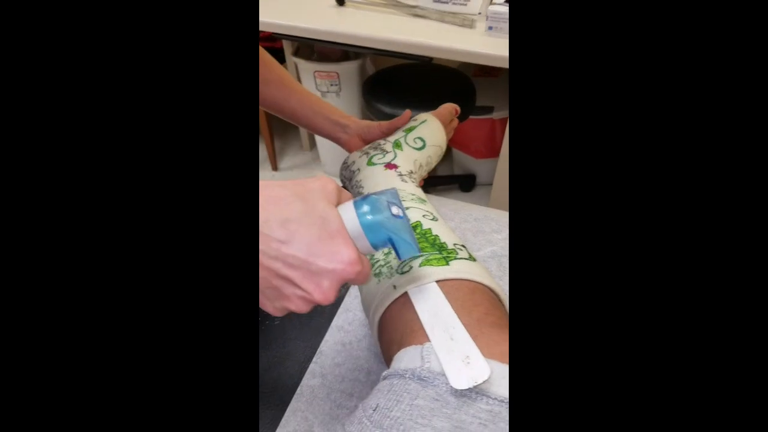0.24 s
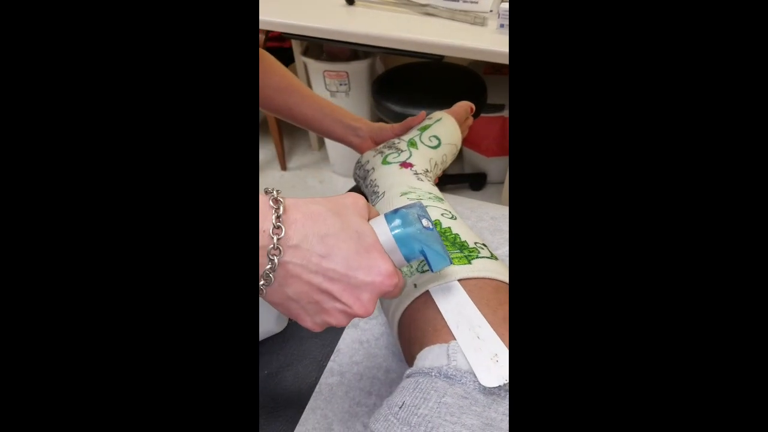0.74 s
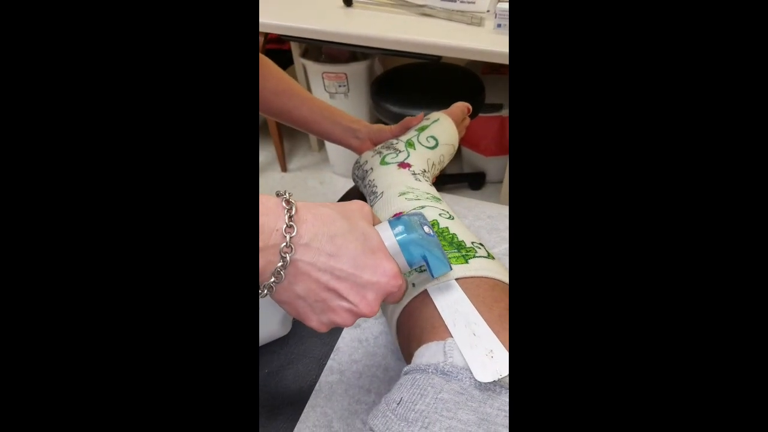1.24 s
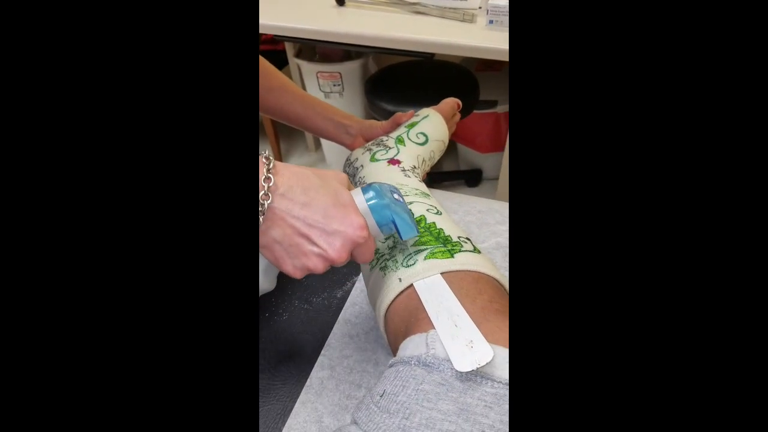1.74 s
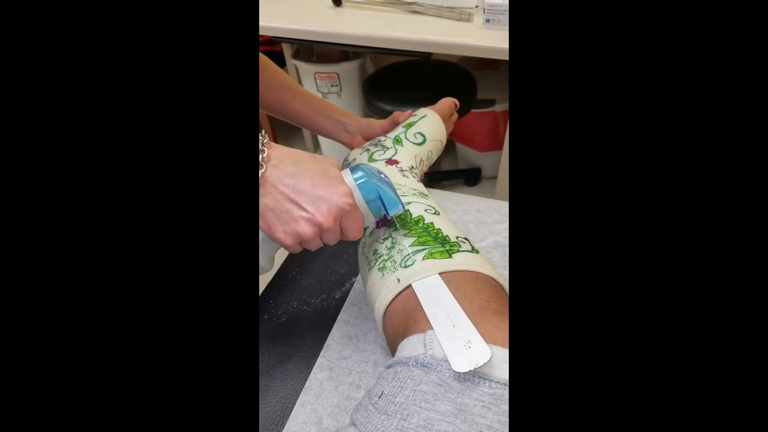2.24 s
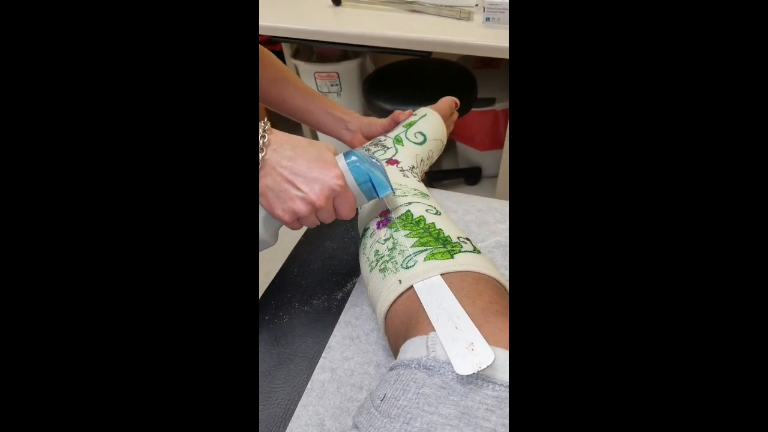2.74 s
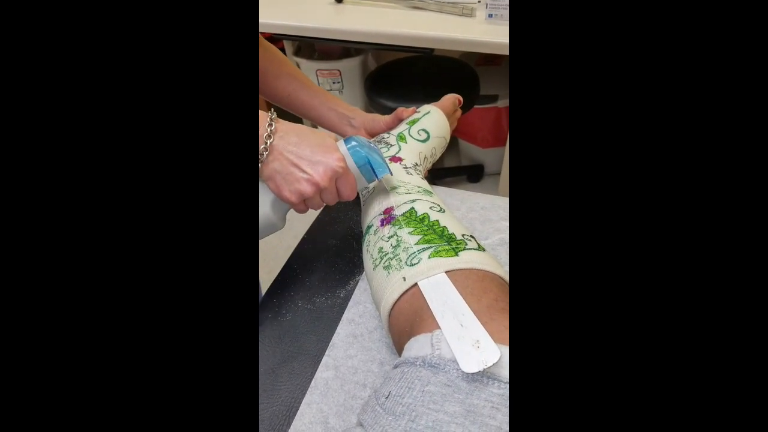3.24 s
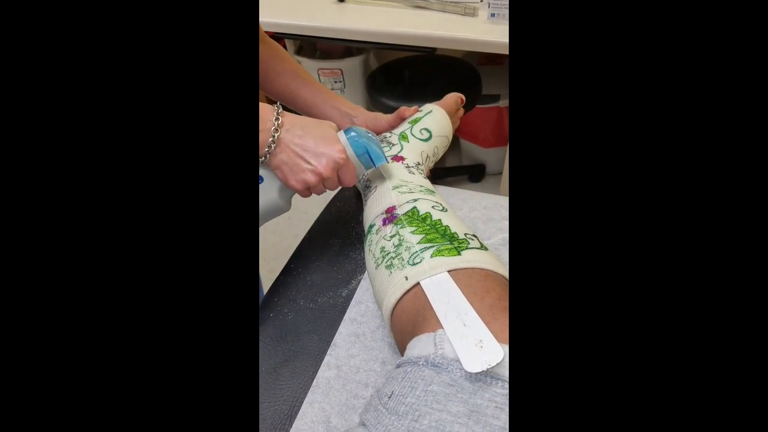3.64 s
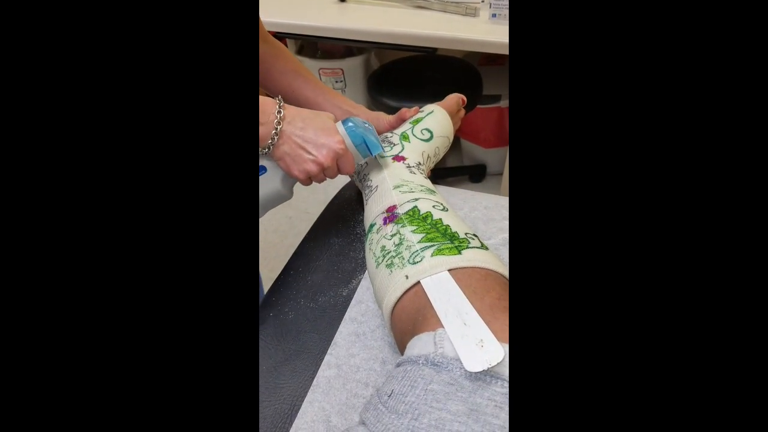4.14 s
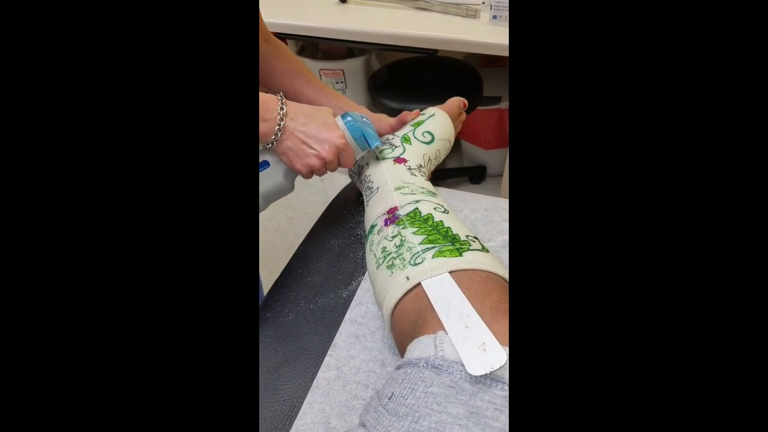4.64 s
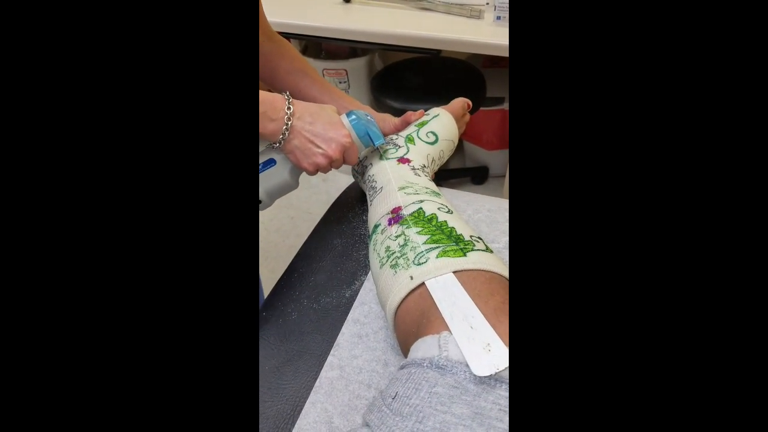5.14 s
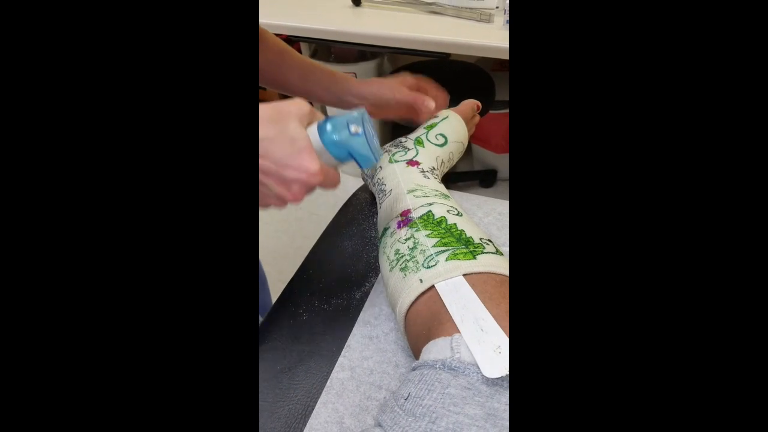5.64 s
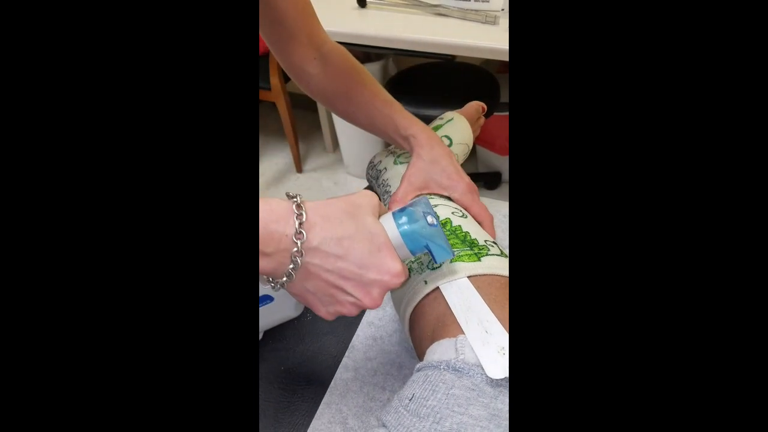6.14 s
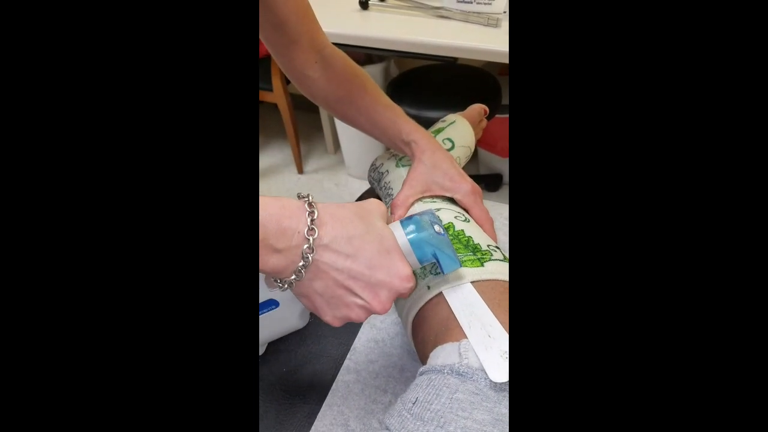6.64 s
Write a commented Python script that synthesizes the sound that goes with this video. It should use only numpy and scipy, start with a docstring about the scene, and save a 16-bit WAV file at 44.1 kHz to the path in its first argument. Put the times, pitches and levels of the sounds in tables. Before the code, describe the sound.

Close, piercing electric saw whine over airy fan rush sags into rough chattering and squealing while cutting a hard shell, with one short clear break.

```python
"""An oscillating cast saw runs close by in a small clinic room and is pushed along a hard leg cast.
Free, its motor whines in multiples of the stroke rate over filtered-noise fan rush; in the cut the motor sags,
the blade rings on the fifth multiple, chatters in fraying partials and rasps in bursts of noise.
The cast shell thrums at the stroke rate, partials squeal and catches of the blade thud in the leg.
The saw is lifted out after five seconds and set in again a second later."""
import sys
import numpy as np
from scipy import signal
from scipy.fft import rfft, irfft, next_fast_len
from scipy.io import wavfile
from scipy.ndimage import uniform_filter1d, minimum_filter1d

SR = 44100
rng = np.random.default_rng(int(sys.argv[2]) if len(sys.argv) > 2 else 0)


def dump_mix(stems):
    """Bounce the given channels to the path in sys.argv[1] as a 16-bit WAV at rate SR."""
    frames = np.atleast_2d(stems).T  # one column per channel
    limited = np.clip(frames, -1, 1)  # hard clip at full scale
    pcm = np.round(limited * 32767).astype(np.int16)
    wavfile.write(sys.argv[1], SR, pcm)


N = 303849
T = np.arange(N) / SR  # time of every sample, s

# motor speed before its fine jitter, sagging as the blade is pushed in: (time [s], stroke rate [Hz])
STROKE_RATE = [(0, 281.1), (1.0, 278.8), (1.35, 276.6), (1.68, 267.7), (2.15, 266.3), (2.6, 264),
               (3.1, 262.7), (3.55, 261.4), (3.9, 260.9), (4.4, 255.3), (4.85, 250.8), (5.3, 247.5),
               (5.42, 267.2), (5.55, 274), (5.95, 278.4), (6.3, 279.8), (6.52, 274), (6.89, 256.6)]
# balance of the motor's partials: (multiple of the stroke rate, relative level [dB])
WHINE_PARTIALS = [(3, -2), (4, -9.5), (6, -14), (7, 6.5), (8, -2), (9, -5.5), (10, 0), (11, -5), (12, -9),
                  (13, -6.5), (14, -2), (15, -5), (16, -15), (19, -30), (21, -24), (25, -12), (26, -13.5),
                  (27, -14), (28, -30), (29, -13), (31, -13.5), (33, -15), (35, -15), (37, -18.5)]
# the blade singing on the fifth multiple of the stroke: (time [s], level [dB])
RING_LEVEL = [(0, -27.5), (.35, -23.5), (.9, -26), (1.2, -19.5), (1.32, -25.5), (1.5, -21), (2.6, -19),
              (3.45, -23.5), (3.75, -28.5), (4.15, -23.5), (5.29, -45), (5.38, -21), (5.62, -27.5),
              (6.12, -15), (6.42, -22.5), (6.6, -16.5), (6.89, -28.5)]
# hum at the stroke rate, loud where the saw bears on the hollow shell: (time [s], level [dB])
THRUM_LEVEL = [(0, -42.5), (1.0, -39), (1.3, -56), (1.55, -38), (2.7, -40), (2.88, -30.5), (3.45, -27),
               (4.1, -23), (5.32, -24.5), (5.35, -48.5), (6.2, -41), (6.42, -43), (6.68, -27.5),
               (6.89, -28.5)]
# hiss of air and dust at the blade, before trim and room: (time [s], level [dB])
HISS_LEVEL = [(0, -26), (1.2, -27), (1.36, -23.5), (1.8, -29), (2.35, -28), (3.0, -31), (3.6, -26.5),
              (4.2, -26.5), (5.12, -21.5), (5.38, -30.5), (5.55, -28), (6.4, -25), (6.89, -31.5)]
# the blade catches and bumps the leg, before trim and soft attack: (time [s], level [dB])
BUMP_HITS = [(1.785, -45), (2.404, -42), (2.553, -50), (2.788, -36), (3.459, -39), (3.727, -44),
             (3.832, -42), (5.315, -41), (5.389, -37), (6.531, -30), (6.667, -29), (6.777, -41)]
# spectra of the fan, chatter, rasp, hiss and shell rattle: (frequency [Hz], relative level [dB])
FAN_SPECTRUM = [(100, -62), (200, -38), (330, -11), (470, -30), (680, -36), (900, -7), (1200, -18),
                (1400, -6), (2100, -3), (2450, -7), (3100, 0), (4100, 1), (4900, -14), (14000, -30)]
CHATTER_SPECTRUM = [(530, -24), (800, -10), (1100, -11.5), (1550, -0.5), (2200, -4.5), (3000, -5),
                    (3400, -9), (4100, -7.5), (5000, -16)]
RASP_SPECTRUM = [(40, -46), (130, -39.5), (260, -11), (420, -14.5), (660, -16), (900, -7.5), (1150, -11.5),
                 (1500, -4), (2000, 1), (3000, -6), (4100, -23.5), (5200, -15), (14000, -41)]
HISS_SPECTRUM = [(200, -86), (900, -73), (2500, -17.5), (4200, 3), (5100, -2), (6400, -1), (7900, 2.5),
                 (8600, -2), (9200, -8.5), (12500, -4), (14500, -9)]
SHELL_SPECTRUM = [(25, -32), (60, -39), (130, 16), (240, -61), (420, 29), (650, 15.5), (1000, 30),
                  (2000, -56)]
# likeness of the noise at left and right, held within 0 to 1 when used: (frequency [Hz], likeness)
STEREO_LIKENESS = [(100, 1.6), (500, 0.7), (1400, -2.2), (2500, 1.24), (4500, -2), (14000, 0.74)]
# stereo tone balance: (frequency [Hz], left minus right [dB])
STEREO_BALANCE = [(100, -1), (260, -2.5), (600, -3), (1400, -.5), (2500, -1.5), (4200, -5), (6000, -4),
                  (8500, 4.5), (14000, 5)]
# a multiple of the stroke meets a mode of the blade or shell and flares up:
# (middle [s], length [s], multiple of the stroke rate, swell level before stutter [dB], left minus right [dB])
SQUEAL_SWELLS = [(0.827, 0.57, 14, -28.5, -25), (1.16, 0.32, 7, -24.5, 0), (1.294, 0.43, 15, -27, -19),
                 (1.43, 0.27, 10, -27.5, -23), (1.967, 0.53, 8, -27, 4), (2.03, 0.41, 6, -28, 10),
                 (2.05, 0.63, 9, -25.5, -3), (2.12, 0.87, 3, -33.5, 23), (3.524, 0.61, 8, -27, 9),
                 (3.96, .14, 11, -22, -1), (3.957, 0.12, 10, -22, -6), (3.986, 0.12, 8, -16, 6),
                 (4.022, 0.43, 6, -21.5, 2), (4.092, 1.07, 2, -29, -15), (4.356, 0.17, 8, -22, 5),
                 (4.53, .16, 8, -20, 4), (4.597, 0.17, 2, -26.5, -11), (4.815, 0.25, 8, -26, 7),
                 (4.861, 0.57, 10, -23, -2), (4.998, 0.24, 8, -28.5, 6), (5.12, 0.26, 10, -24.5, -3),
                 (5.301, 0.33, 8, -34, 7), (5.31, 0.053, 2, -24, -6), (5.899, 1.06, 11, -31, -8),
                 (5.949, 0.68, 15, -29.5, -9), (6.2, 0.43, 7, -27.5, -23), (6.5, 0.2, 10, -19.5, -8),
                 (6.739, 0.22, 3, -35, -2)]
# the blade is in the cast: (set in [s], lifted out [s])
CUT_TIMES = [(1.14, 5.33), (6.27, 7.0)]
# layer levels: (running free [dB], change in the slot [dB], further change at full load [dB])
WHINE_LAW = (-15.5, -12.5, -31)
CHATTER_LAW = (-44, 23.5, 2)
RASP_LAW = (-43.5, 15.5, -5)  # before the room
OCTAVE_LAW = (-37.5, 0.5, 6)
# where the saw is on the leg, 0 at the shin and 1 at the ankle, at times beyond: (time [s], place)
LEG_PLACE = [(0, 0.95), (.8, -1.04), (1.7, 0.24), (3.7, 0.66), (5.5, 0.7), (6.2, 0), (6.89, -.2)]
# the teeth tear out a patch of fibres, before the room: (middle [s], length [s], peak level [dB])
FIBRE_TEARS = [(1.57, 0.32, -31), (1.795, 0.046, -24), (2.11, 0.36, -27), (2.328, 0.17, -21),
               (2.798, 0.19, -24.5), (3.23, 0.2, -25), (3.4, 0.092, -20), (3.694, 0.56, -19.5),
               (4.153, 0.26, -22), (4.446, 0.23, -22.5), (4.65, 0.16, -24), (5.318, 0.094, -34),
               (6.48, 0.28, -26)]

FREE_HZ, FULL_SAG_HZ = 280, 30  # unloaded stroke rate, and its drop at full load
SINK_S, CLEAR_S = 0.3, 0.081  # time to sink into the slot and to come clear of it
BLADE_HZ, BLADE_WANDER_HZ = 2057, 40  # resonance of the blade, shifting a little with the slot's grip
FAN_DB = -28.5  # rush of the motor's fan, before the room
DISPERSION = .5  # the saw's body smears each stroke: phase lag in radians per squared multiple
EDGE_HZ = 14600  # upper band limit


def amp(db):
    """Decibels to gain."""
    return 10 ** (np.asarray(db) / 20)


def unit(x):
    """Scales to rms 1."""
    return x / np.sqrt(np.mean(abs(x) ** 2) + 1e-20)


def curve(rows, axis=1):
    """One column of a time table at every sample."""
    rows = np.array(rows)
    return np.interp(T, rows[:, 0], rows[:, axis])


def read(points, hz):
    """A spectrum table on a log-frequency axis."""
    f, value = np.transpose(points)
    return np.interp(np.log(hz + 1), np.log(f + 1), value)


def drift(hz):
    """Slow chance of rms 1, up to about hz changes a second."""
    count = 4096
    f = np.fft.rfftfreq(count, T[-1] / count)
    rolloff = np.sqrt(1 + (f / hz) ** 4)
    slow = irfft(rfft(rng.standard_normal(count)) / rolloff)
    return np.interp(T, np.linspace(0, T[-1], count), unit(slow))


def flutter(hz):
    """Random wobble in both strength and phase, rms 1."""
    return (drift(hz) + 1j * drift(hz)) / np.sqrt(2)


def arch(middle, length):
    """A swell from 0 to 1 and back."""
    now = abs(T - middle) < length / 2
    out = np.zeros(N)
    out[now] = np.cos(np.pi * (T[now] - middle) / length)
    return out


def colour(x, points, size=4096):
    """Causal minimum-phase filter with the given spectrum, scaled to rms 1."""
    hz = abs(np.fft.fftfreq(size, 1 / SR))
    log_gain = np.log(amp(read(points, hz)))
    response = np.exp(np.conj(signal.hilbert(log_gain)))
    taps = np.fft.ifft(response).real[:size // 2]
    return unit(signal.oaconvolve(x, taps[None], axes=1)[:, :N])


def resonate(x, hz, width_hz):
    """A resonance of gain 1 that follows the curve hz."""
    turn = np.exp(2j * np.pi * np.cumsum(hz) / SR)
    r = np.exp(-np.pi * width_hz / SR)
    # shift the resonance down to 0 Hz, smooth there, and shift back
    smooth = signal.lfilter([1 - r], [1, -r], x / turn)
    return 2 * (turn * smooth).real


def stereo(pair):
    """Blends two unrelated signals so that left and right are as alike as the likeness table says."""
    size = next_fast_len(N)
    a, b = rfft(pair, size)
    same = np.clip(read(STEREO_LIKENESS, np.fft.rfftfreq(size, 1 / SR)), 0, 1)
    mid = a * np.sqrt(1 + same)
    side = b * np.sqrt(1 - same)
    return unit(irfft(np.array([mid + side, mid - side]), size)[:, :N])


def noise():
    """White noise in stereo."""
    return stereo(rng.standard_normal((2, N)))


def lean(db):
    """Left and right gains for a left-minus-right level, at equal total power."""
    pair = amp(np.outer([.5, -.5], db))
    return pair / np.sqrt((pair ** 2).mean(axis=0))


def partial(turns, order, apart):
    """One multiple of the stroke, reaching left and right out of step by twice apart, in radians."""
    phase = 2 * np.pi * (order * turns % 1) - DISPERSION * order ** 2
    left_right = (phase + np.array([[1], [-1]]) * apart).astype(np.float32)
    return np.cos(left_right) + 1j * np.sin(left_right)


def depth():
    """How deep the blade sits in the slot, 0 to 1."""
    total = 0
    for start, end in CUT_TIMES:
        sinking = np.clip((T - start) / SINK_S, 0, 1)
        clearing = np.clip(1 - (T - end) / CLEAR_S, 0, 1)
        total = total + sinking * clearing
    return total


def load():
    """How hard the motor works, 0 to 1: its speed sags in proportion."""
    return np.clip((FREE_HZ - curve(STROKE_RATE)) / FULL_SAG_HZ, 0, 1)


def level(law):
    """A layer's gain from the blade's depth and the motor's load."""
    free_db, slot_db, load_db = law
    return amp(free_db + slot_db * depth() + load_db * load())


def blade_hz():
    """The blade's wandering resonance at every sample."""
    return BLADE_HZ + BLADE_WANDER_HZ * drift(3.3)


def gripped(x, width_hz, lift):
    """The blade's moving resonance lifts part of the cutting sound."""
    return unit(x + lift * resonate(x, blade_hz(), width_hz))


def tearing():
    """Strength of the rasp: a steady scrape in the slot and a swell for each torn patch, summed in power."""
    patches = sum((amp(db) * arch(s, length)) ** 2 for s, length, db in FIBRE_TEARS)
    return np.sqrt(level(RASP_LAW) ** 2 + patches)


def room(x, t60=.3, wet_db=-11):
    """A short diffuse tail of decaying noise from the hard walls, different at left and right."""
    t = T[:SR // 2]
    tail = rng.standard_normal((2, len(t))) * amp(-60 * t / t60) * (t > .004)
    tail /= np.linalg.norm(tail, axis=1, keepdims=True)
    return x + amp(wet_db) * signal.oaconvolve(x, tail, axes=1)[:, :N]


def air(turns, hiss_db=-3.42, gate=0.22, flicker_db=2.0):
    """Fan rush and the hiss of air and dust at the blade, both noise that pulses with each stroke and flickers."""
    puffs = (1 + gate * np.sin(2 * np.pi * turns)) * amp(flicker_db * drift(76))
    fan = amp(FAN_DB) * colour(noise() * puffs, FAN_SPECTRUM)
    hiss = amp(curve(HISS_LEVEL) + hiss_db) * colour(noise() * puffs, HISS_SPECTRUM)
    return fan + hiss


def bumps(leg_hz=120, t60=0.092, rise=0.0063, level_db=3):
    """Each catch of the blade gives the padded leg a short low thud, a decaying sine."""
    out = np.zeros(N)
    detunes = rng.uniform(0.92, 1.08, len(BUMP_HITS))
    for (s, db), detune in zip(BUMP_HITS, detunes):
        part = out[round(s * SR):][:SR // 4]  # a view: adding to it adds to out
        t = T[:len(part)]
        envelope = amp(db + level_db - 60 * t / t60) * (1 - np.exp(-t / rise))
        part += envelope * np.sin(2 * np.pi * leg_hz * detune * t)
    return out


def thrum(turns, shake=0.26, waver_db=2, rattle_db=3, tear=0.79):
    """A hum at the stroke rate and its octave; hard, tearing pressure adds a dull rattle of the hollow shell."""
    first = amp(curve(THRUM_LEVEL))
    second = level(OCTAVE_LAW) * amp(waver_db * depth() * drift(13))
    stroke = np.exp(2j * np.pi * turns)
    unsteady = shake * (0.66 + 0.53 * depth())  # steadier in free air
    hum = first * stroke * (1 + unsteady * flutter(18))
    hum = hum + second * stroke ** 2 * (1 + unsteady * flutter(23))
    rattle = first * tearing() ** tear * amp(rattle_db) * colour(noise(), SHELL_SPECTRUM)
    return np.sqrt(2) * hum.imag + rattle


def bearing(turns, ratios=(7.215, 11.14), level_db=-37):
    """Faint bearing tones between the partials, unsteady in phase."""
    return amp(level_db) * sum(np.sin(2 * np.pi * r * turns + drift(12.0)) for r in ratios)


def squeals(turns, apart=0.76):
    """Single partials swell, stutter and die away as the blade binds or swings free."""
    shake, stutter_db = .3, 1.5
    bead_hz, bead = 27, .65  # rate and depth of the skipping
    bind = 0.44 + 0.65 * depth()  # a gripped blade stutters more
    skips = np.sin(2 * np.pi * bead_hz * T + 2 * drift(7.2))  # the blade skips in the slot
    stutter = (1 + bead * bind * skips) * amp(stutter_db * bind * drift(21))
    spread = apart * curve(LEG_PLACE)
    out = np.zeros((2, N))
    for s, length, order, db, side_db in SQUEAL_SWELLS:
        now = abs(T - s) < length / 2
        swell = (arch(s, length) * stutter * (1 + shake * bind * flutter(15)))[now]
        tone = (swell * partial(turns[now], order, spread[now])).real
        out[:, now] += amp(db) * lean(side_db) * tone
    return np.sqrt(2) * out


def rasp(turns, gate=0.1):
    """Fibres snap in uneven bursts of noise while the teeth sweep through the cast."""
    grain_db, clump_db = 1.4, 1.1  # fine and coarse unevenness
    sweep = 1 + gate * np.sin(2 * np.pi * turns)
    bursts = sweep * amp(grain_db * drift(210) + clump_db * drift(25))
    fibres = colour(noise() * bursts, RASP_SPECTRUM)
    return gripped(fibres, width_hz=140, lift=0.69) * tearing()


def chatter(turns, width_hz=110, lift=1.07, apart=1.0, brighten_db=9, usual_load=0.71):
    """Teeth strike the slot once a stroke, brighter under load; stick and slip make the partials stutter and fray."""
    slip, shake, fray, throb_db = .008, .42, .3, 1.5  # slip is in strokes
    place = turns + slip * drift(23)
    speed, grip = curve(STROKE_RATE), blade_hz()
    spread = apart * curve(LEG_PLACE)
    tilt_db = brighten_db * (load() - usual_load)  # per octave
    out, power = np.zeros((2, N)), np.zeros(N)
    for order in [3, 4, *range(6, 18)]:  # the ring takes the fifth
        octaves = np.log2(max(order, 6) / 8)
        body = amp(read(CHATTER_SPECTRUM, order * speed.mean()) + tilt_db * octaves)
        # a partial near the blade's resonance is lifted
        gain = body * (1 + lift / (1 + ((order * speed - grip) / width_hz) ** 2))
        loose = order / 8  # higher partials are less steady
        unsteady = 1 + loose * (shake * flutter(12) + fray * flutter(29))
        out += gain * (partial(place, order, spread) * unsteady).real
        power += gain ** 2 * (1 + loose ** 2 * (shake ** 2 + fray ** 2)) / 2
    return out / np.sqrt(power) * level(CHATTER_LAW) * amp(throb_db * drift(29.0))


def ring(turns, level_db=0, shake=0.21, apart=0.8, shin_db=-4, travel_db=9):
    """The blade's note, locked to the fifth multiple of the stroke, moves from right to left towards the ankle."""
    place = curve(LEG_PLACE)
    tone = partial(turns, order=5, apart=apart * place) * (1 + shake * flutter(31))
    return amp(curve(RING_LEVEL) + level_db) * unit(tone.real) * lean(shin_db + travel_db * place)


def whine(turns, right_db=1.1, waver_db=2.42):
    """Clean partials of the drive, strongest running free; each swells and fades as the hand moves the saw."""
    apart, waver_hz = .45, 2
    out = np.zeros((2, N))
    for order, db in WHINE_PARTIALS:
        swell = amp(db + waver_db * drift(waver_hz))
        out += swell * partial(turns, order, apart * rng.choice([-1, 1])).real
    return unit(out) * level(WHINE_LAW) * amp([[-right_db], [right_db]])


def scene(hunt=0.001463):
    """Every layer but the bumps rides on the same blade stroke, less even in the cut; walls diffuse the rush."""
    jitter = (0.00026 + hunt * depth()) * drift(11.2)
    turns = np.cumsum(curve(STROKE_RATE) * (1 + jitter)) / SR  # strokes so far
    rushing = air(turns) + rasp(turns)
    tones = thrum(turns) + bearing(turns) + squeals(turns) + chatter(turns) + ring(turns) + whine(turns)
    return room(rushing, t60=0.11, wet_db=4.5) + bumps() + tones


def limiter(x):
    """Turns the gain down for about ten milliseconds either side of peaks near full scale."""
    ceiling = .93
    needed = ceiling / np.maximum(abs(x).max(axis=0), ceiling)
    return x * uniform_filter1d(minimum_filter1d(needed, size=441), size=441)


def record(dry):
    """Stereo tone balance, the limiter, soft ends, then the band limit."""
    size = next_fast_len(N)
    lean_db = read(STEREO_BALANCE, np.fft.rfftfreq(size, 1 / SR)) / 2
    balanced = irfft(rfft(dry, size) * amp([lean_db, -lean_db]), size)[:, :N]
    lowpass = signal.firwin(701, EDGE_HZ, window=("kaiser", 9), fs=SR)
    soft_ends = signal.windows.tukey(N, .002)
    return signal.oaconvolve(limiter(balanced) * soft_ends, lowpass[None], "same", axes=1)


dry = scene()
out = record(dry)
dump_mix(out)
```